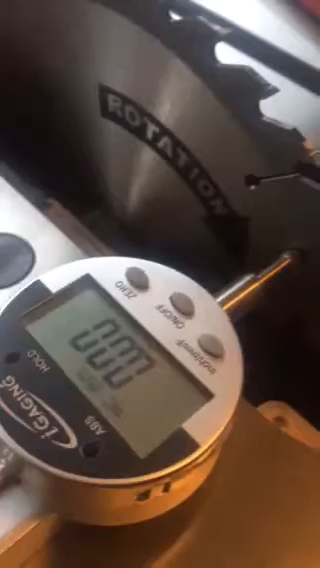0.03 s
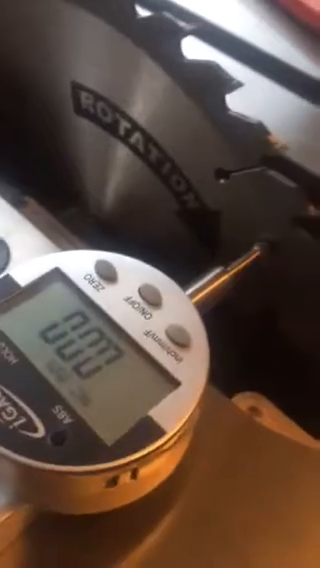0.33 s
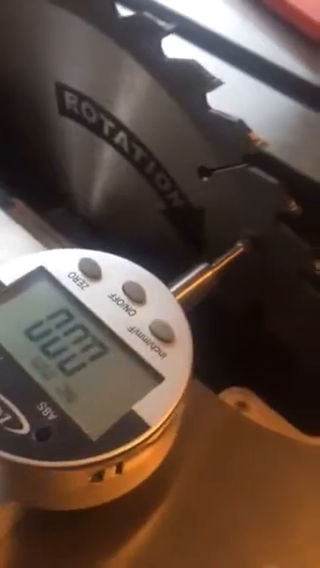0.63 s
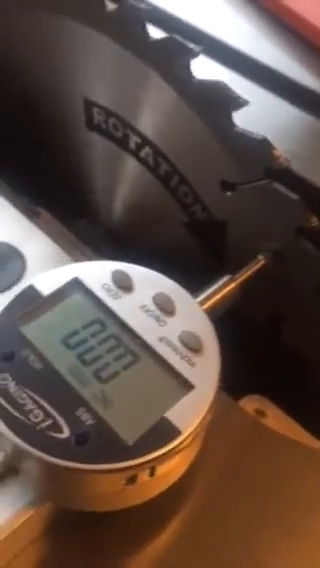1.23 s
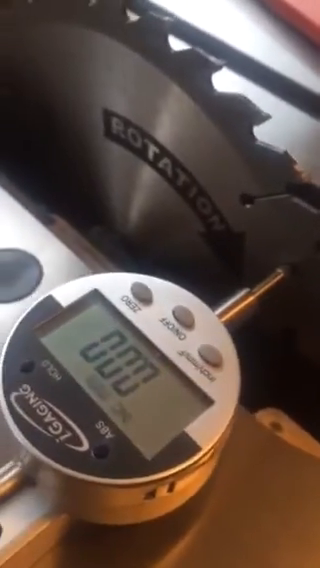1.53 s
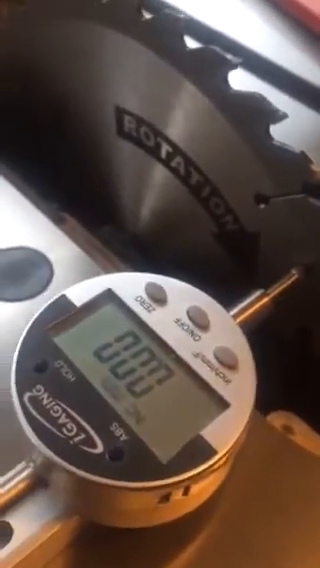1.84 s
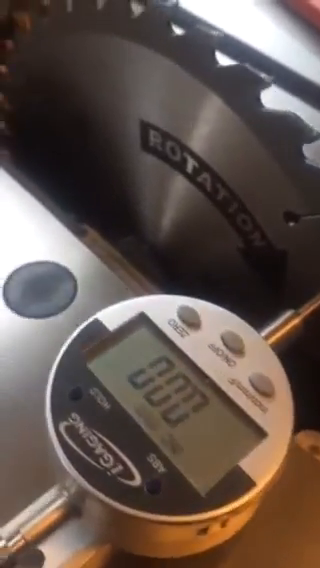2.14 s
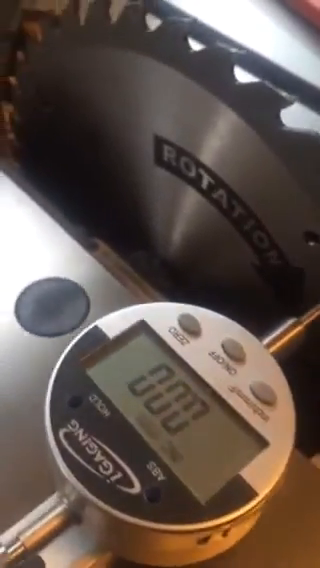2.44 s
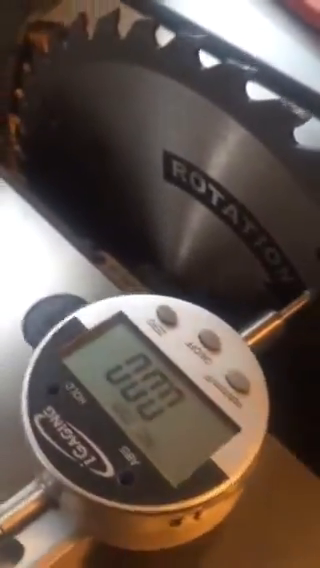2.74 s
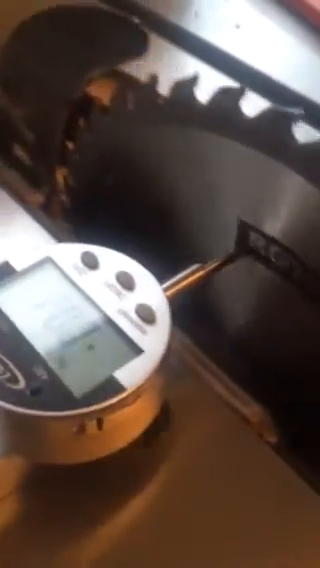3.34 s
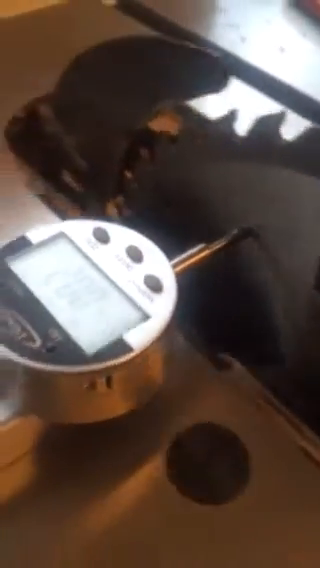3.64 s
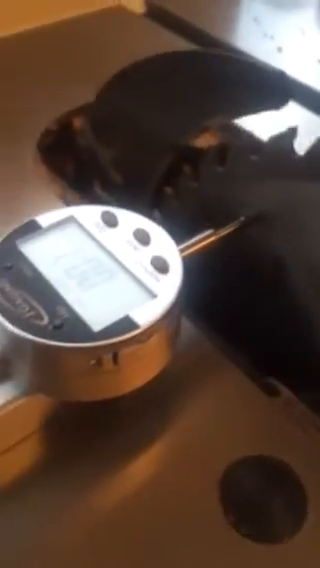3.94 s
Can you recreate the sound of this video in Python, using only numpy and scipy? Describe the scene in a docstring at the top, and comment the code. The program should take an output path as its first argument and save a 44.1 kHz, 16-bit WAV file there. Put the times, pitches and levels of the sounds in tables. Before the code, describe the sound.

Metal scraping and ringing as a hand-turned saw blade rubs along a gauge tip.

```python
"""Saw blade against a dial gauge

A circular saw blade is turned by hand against the gauge's steel tip, in a quiet workshop with a faint hum.
The tip barely brushes and ticks, then comes a short push and a long scrape. The rough contact rings gauge
and blade, whose modes swell in turn and briefly squeal as it travels; the arbor rumbles underneath."""
import sys
import numpy as np
from scipy import signal
from scipy.fft import rfft, irfft, next_fast_len
from scipy.io import wavfile
from scipy.ndimage import map_coordinates

SR = 44100
rng = np.random.default_rng(int(sys.argv[2]) if len(sys.argv) > 2 else 0)


def transcribe(signal):
    """Save signal, clipped to [-1, 1], as a 16-bit WAV file at the path in sys.argv[1]."""
    frames = np.atleast_2d(signal).T
    limited = np.clip(frames, -1, 1)
    pcm = np.round(limited * 32767).astype(np.int16)
    wavfile.write(sys.argv[1], SR, pcm)


N = 176400


# broad scrape spectrum: f/Hz, level/dB
SCRAPE_COLOUR = [(30, -20), (90, -1), (220, -4.5), (305, -2.5), (385, -22), (550, -5), (670, -19.5),
                 (820, -2), (1250, -5.5), (2000, -0.7), (3050, -3), (3450, -10.5), (6400, -13.5),
                 (9000, -22), (12500, -28), (15000, -32)]

def scrape(body_db=-3.5):
    """Friction noise and the ringing it drives in blade and gauge, all following the tip's pressure."""
    body = amp(body_db) * coloured(friction(), SCRAPE_COLOUR)
    return pressure() * (body + shimmer() + gauge() + blade())


def friction(slips_per_s=1800, spread_db=4.5, rub_db=-0.5, judder_hz=69.65, judder_db=2):
    """Force at the tip: tiny slips over grinding marks, on a smooth rub, juddering in strength."""
    slipping = rng.random(N) < slips_per_s / SR
    sizes = amp(spread_db * np.clip(rng.standard_normal(N), -2, 2))
    slips = unit(slipping * sizes * np.sign(rng.standard_normal(N)))
    rub = amp(rub_db) * rng.standard_normal(N)
    return unit((slips + rub) * amp(judder_db * wobble(judder_hz)))


# hand's push: t/s, level/dB
PUSH = [(2.3, -84), (2.395, -77), (2.41, -63.5), (2.435, -66), (2.47, -51), (2.51, -53), (2.57, -55),
        (2.63, -67.5), (2.68, -64.5), (2.77, -48), (2.85, -44.5), (3.0, -43.5), (3.11, -42), (3.26, -43.5),
        (3.47, -45.5), (3.53, -41.5), (3.585, -43.5), (3.7, -42), (3.8, -43.5), (3.92, -46), (4.0, -45)]
# catches on rough spots: t/s, boost/dB
TIP_CATCHES = [(2.743, 5.5), (2.822, 5.5), (2.931, 6.5), (3.069, 6), (3.493, 0), (3.672, 4), (3.812, 6),
               (3.895, 2.5)]

def pressure(decay_s=0.012):
    """The hand's push, with a jump that dies quickly wherever the tip catches and bites harder."""
    t = clock()
    bite_db = sum(db * (t > s) * np.exp(-np.abs(t - s) / decay_s) for s, db in TIP_CATCHES)
    return amp(curves(PUSH)[0] + bite_db) * (t > PUSH[0][0])


# gauge, arm and table resonances: f/Hz, width/Hz, relative level/dB, peak t/s, half length/s
GAUGE_MODES = [(301, 27, -15.5, 3.05, 0.27), (550, 120, -9, 2.6, 0.18), (835.4, 33, -7, 3.13, 0.44),
               (1000, 150, -9.5, 3.46, 0.23), (1446, 64, -7.5, 3.22, 0.39), (2733, 140, -3.5, 3.856, 0.15),
               (3682, 66, -18, 3.34, 1), (4658, 110, -7, 3.235, 0.32), (13300, 220, -26, 3.6, 0.29)]

def gauge(rest_db=-9):
    """Damped resonances of the gauge and its support, each swelling where the contact drives it best."""
    out = np.zeros(N)
    for hz, width_hz, db, peak_s, half_s in GAUGE_MODES:
        drive = amp(db + rest_db * (1 - swell(peak_s, half_s)))
        out += drive * resonate(friction(), hz, width_hz)
    return out


# blade modes: f/Hz, relative level/dB, peak t/s, half length/s
BLADE_MODES = [(1068, -13.5, 3.66, .15), (1260, -14, 2.56, .08), (1638, -15, 3.25, .15),
               (1860, -16.5, 2.52, .07), (2238, -15, 3.7, .1), (2405, -15, 2.72, .15),
               (2752, -13, 3.96, .2), (2905, -16, 2.6, .15), (2992, -14.5, 3.8, .12),
               (3195, -15.5, 3.88, .13), (4404, -16.5, 3.82, .09), (4560, -15, 2.52, .08),
               (5362, -18, 3.72, .08), (5582, -15.5, 3.82, .12), (6182, -17, 3.68, .08),
               (6321, -17.5, 3.68, .11), (6557, -21, 3.9, .15), (7202, -17.5, 3.74, .11),
               (7955, -16, 3.1, .06), (8183, -23, 3.88, .15), (8335, -24, 3.85, .17),
               (10148, -26, 3.82, .1), (10890, -28, 3.82, .1), (11970, -28, 3.6, .3)]

def blade(width_hz=24, gain_db=3.5, rest_db=-10.5):
    """One force rings the blade's narrow modes; each swells as the contact crosses its antinode."""
    force, out = friction(), np.zeros(N)
    for hz, db, peak_s, half_s in BLADE_MODES:
        drive = amp(gain_db + db + rest_db * (1 - swell(peak_s, half_s)))
        out += drive * rng.choice([-1, 1]) * resonate(force, hz, width_hz)
    return out


# upper-mode envelope: t/s, relative level/dB
SHIMMER_LEVEL = [(2.48, -7), (2.6, -14), (2.84, -9), (2.97, -18), (3.11, -6), (3.22, -9.5), (3.45, -13.5),
                 (3.65, -6), (4.0, -12.5)]
# upper-mode spectrum: f/Hz, level/dB
SHIMMER_SPECTRUM = [(1800, -21), (3000, 1), (4000, 2.5), (6400, -1.5), (8000, -3.5), (10500, -10),
                    (15000, -25)]

def shimmer(count=70, width_hz=22, spread_db=8):
    """Friction rings the blade's many weak upper modes, scattered in pitch and strength."""
    force = friction()
    t, ring = np.arange(SR // 8) / SR, 0
    hz, db = np.transpose(SHIMMER_SPECTRUM)
    for k, (place, size) in enumerate(rng.random((count, 2))):
        mode_hz = hz[0] + (hz[-1] - hz[0]) * (k + place) / count
        gain = amp(np.interp(mode_hz, hz, db) + spread_db * size)
        ring = ring + gain * np.sin(2 * np.pi * mode_hz * t)
    ring *= np.exp(-np.pi * width_hz * t)
    return amp(curves(SHIMMER_LEVEL)[0]) * unit(signal.fftconvolve(force, ring)[:N])


# stick-slip squeals: t/s, half length/s, f/Hz, level/dB
BLADE_SQUEALS = [(2.485, .018, 10325, -65), (2.49, .018, 6212, -61), (2.785, .04, 10300, -67),
                 (2.85, .02, 7058, -61), (2.87, .035, 5405, -57.5), (3.11, .012, 6321, -52.5),
                 (3.68, .02, 6321, -53), (3.727, .008, 5362, -47.5), (3.73, .03, 7202, -57)]

def squeals(flutter_hz=190, flutter_db=2.5, drift_rad=.8):
    """Stick-slip briefly locks onto one mode: a gritty zing, fluttering in phase and strength."""
    out = np.zeros(N)
    for s, half_s, hz, db in BLADE_SQUEALS:
        tone = unit(np.sin(2 * np.pi * hz * clock() + drift_rad * wobble(flutter_hz)))
        out += amp(db + flutter_db * wobble(flutter_hz)) * swell(s, half_s) * tone
    return out


# arbor rumble: t/s, centre f/Hz, level/dB
ARBOR_RUMBLE = [(2.38, 193.6, -66), (2.49, 196.7, -53.5), (2.56, 186, -58), (2.7, 154, -57.5),
                (2.84, 140, -57.5), (2.875, 148.3, -45.5), (3.0, 148.5, -47), (3.07, 182, -56),
                (3.15, 157.3, -54.5), (3.25, 166, -60), (3.33, 157.9, -58), (3.47, 159.8, -60),
                (3.67, 174, -54), (3.8, 171.6, -54), (4.0, 161.2, -52)]

def arbor(flutter_hz=46, skirt_hz=110, skirt_db=-4, octave_db=-13.5):
    """A rough rumble and its octave, shifting in pitch as the hand turns the blade."""
    def band(carrier, rate_hz):
        return unit(np.real(carrier * (wobble(rate_hz) + 1j * wobble(rate_hz))))

    hz, db = curves(ARBOR_RUMBLE)
    carrier = np.exp(2j * np.pi * np.cumsum(hz) / SR)
    core = band(carrier, flutter_hz)
    skirt = amp(skirt_db) * band(carrier, skirt_hz)
    octave = amp(octave_db) * band(carrier ** 2, flutter_hz)
    return amp(db) * (clock() > ARBOR_RUMBLE[0][0]) * unit(core + skirt + octave)


# plunger ticks: t/s, level/dB
PLUNGER_TICKS = [(2.151, -68), (2.178, -59)]
# tick spectrum: f/Hz, level/dB
TICK_SPECTRUM = [(1000, -18), (3900, -17.5), (4500, 9), (4850, -3), (5400, -13), (7000, -5), (8500, -19),
                 (15000, -12)]

def ticks(rise_s=0.00028, t60_s=0.024):
    """The plunger catches and lets go with a short ring."""
    ring, out = coloured(rng.standard_normal(N), TICK_SPECTRUM), np.zeros(N)
    for s, db in PLUNGER_TICKS:
        age = np.maximum(clock() - s, 0)
        out += amp(db - 60 * age / t60_s) * (1 - np.exp(-age / rise_s)) * ring
    return out


# light touches: t/s, half length/s, level/dB
TOUCHES = [(1.53, 0.18, -81), (1.735, 0.023, -82.5), (1.78, 0.033, -79)]
# brush spectrum: f/Hz, level/dB
BRUSH_SPECTRUM = [(1000, -13), (2100, 0), (2280, 4.5), (2600, -6.5), (7000, -12), (15000, -29)]
# plunger modes: f/Hz, relative level/dB
PLUNGER_MODES = [(2890, -5.5), (4720, -.5), (6810, -7.5)]

def brushes(width_hz=70):
    """The tip barely rubs the blade; only the last, hardest touch rings the plunger."""
    touches = [amp(db) * swell(s, half_s) for s, half_s, db in TOUCHES]
    force = friction()
    ring = sum(amp(db) * resonate(force, hz, width_hz) for hz, db in PLUNGER_MODES)
    return sum(touches) * coloured(force, BRUSH_SPECTRUM) + touches[-1] * ring


# hand shuffle spectrum: f/Hz, level/dB
HAND_SPECTRUM = [(200, -10), (620, 10), (900, -15), (1700, -7), (4000, -30)]

def hand(at_s=1.935, half_s=.055, level_db=-72):
    """The hand shifts its hold with a soft shuffle."""
    return amp(level_db) * swell(at_s, half_s) * coloured(rng.standard_normal(N), HAND_SPECTRUM)


# machine hum: f/Hz, level/dB
HUM_TONES = [(70, -80), (209.9, -74.5), (247.6, -77), (296.1, -70.5), (592.2, -85.5)]
# air noise spectrum: f/Hz, level/dB
AIR_SPECTRUM = [(25, -22), (40, -4.5), (52, -0.5), (145, -1), (175, -6), (315, -7.5), (450, -10.5),
                (560, -16.5), (1000, -20.5), (2000, -27.5), (4000, -31.5), (15000, -37)]

def workshop(air_db=-65, drift_rad=0.58, drift_hz=4.45):
    """Low air noise and the wavering hum of a distant machine."""
    hum = np.zeros(N)
    for hz, db in HUM_TONES:
        hum += amp(db) * unit(np.sin(2 * np.pi * hz * clock() + drift_rad * wobble(drift_hz)))
    return hum + amp(air_db) * coloured(rng.standard_normal(N), AIR_SPECTRUM)


def room(x, t60_s=0.23, wet_db=-9.5):
    """x plus short reflections from the saw table and the walls."""
    t = np.arange(SR // 2) / SR
    tail = rng.standard_normal(len(t)) * amp(-60 * t / t60_s)
    return x + amp(wet_db) * signal.fftconvolve(x, tail / np.linalg.norm(tail))[:N]


def amp(db):
    """Decibels to gain."""
    return 10 ** (np.asarray(db) / 20)


def unit(x):
    """Scale to rms 1."""
    return x / np.sqrt(np.mean(x ** 2) + 1e-20)


def clock():
    """Sample times in s."""
    return np.arange(N) / SR


def curves(rows):
    """One value per sample for each column after the time."""
    s, *cols = np.transpose(rows)
    return [np.interp(clock(), s, c) for c in cols]


def swell(peak_s, half_s):
    """Bell-shaped rise and fall."""
    return np.exp(-.5 * ((clock() - peak_s) / half_s) ** 2)


def wobble(rate_hz):
    """Smooth random curve, rate_hz knots a second."""
    return map_coordinates(rng.standard_normal(N // 20), [clock() * rate_hz + 2], mode="mirror")


def filtered(x, response):
    """x through a frequency response."""
    m = next_fast_len(N + SR // 2)
    return irfft(rfft(x, m) * response(np.fft.rfftfreq(m, 1 / SR)), m)[:N]


def coloured(x, points):
    """x through a spectrum (f/Hz, level/dB), rolled off below its first point, at rms 1."""
    hz, db = np.transpose(points)

    def response(f):
        return amp(np.interp(np.log(f + 1), np.log(hz), db)) * f / np.hypot(f, hz[0])

    return unit(filtered(x, response))


def resonate(x, hz, width_hz):
    """x through one resonance, at rms 1."""
    return unit(filtered(x, lambda f: 1j * f * width_hz / (hz * hz - f * f + 1j * f * width_hz)))


def scene():
    """Contact sounds in the room, over arbor and workshop; mono."""
    contact = scrape() + squeals() + brushes() + hand() + ticks()
    return (room(contact) + arbor() + workshop())[None]


def record(dry, start_s=.084, fade_s=.003, top_hz=15250):
    """Quick fade-in after a moment of silence, then a hard low-pass."""
    fade_in = np.clip((clock() - start_s) / fade_s, 0, 1)
    return filtered(dry[0] * fade_in, lambda f: f < top_hz)[None]


dry = scene()
out = record(dry)
transcribe(out)
```